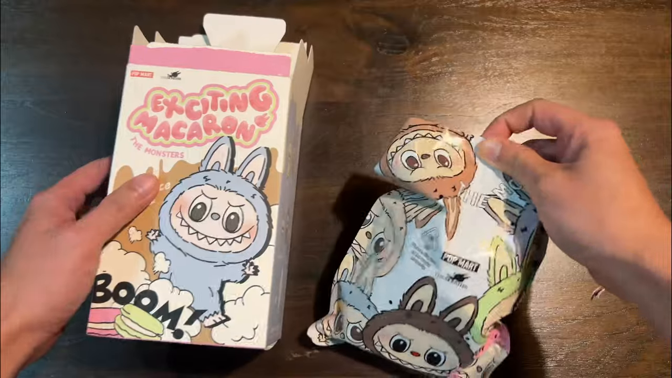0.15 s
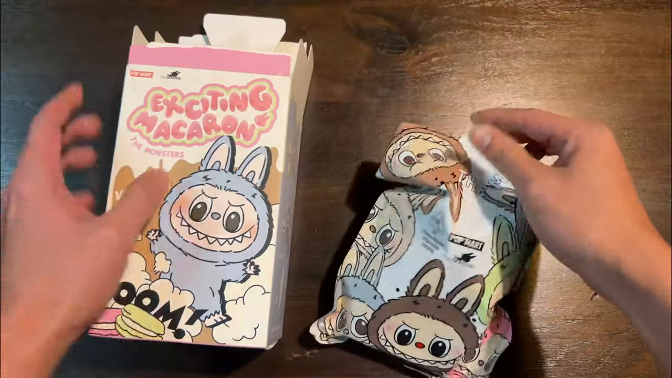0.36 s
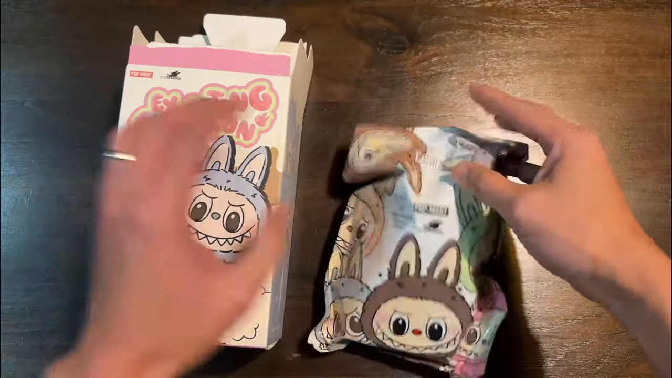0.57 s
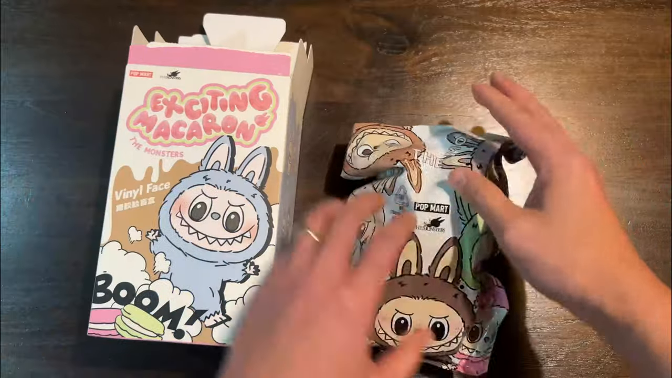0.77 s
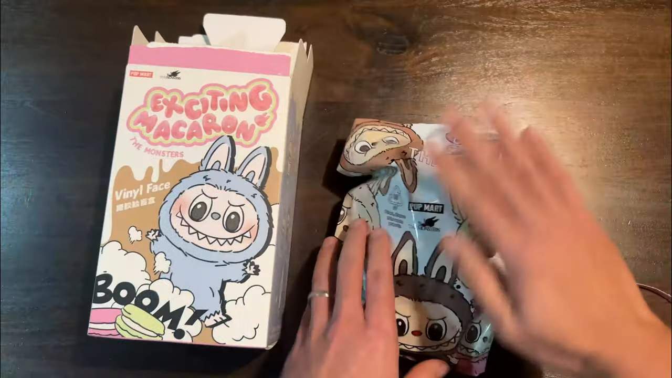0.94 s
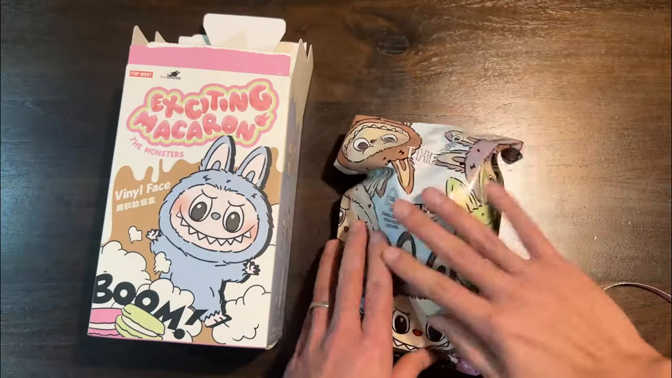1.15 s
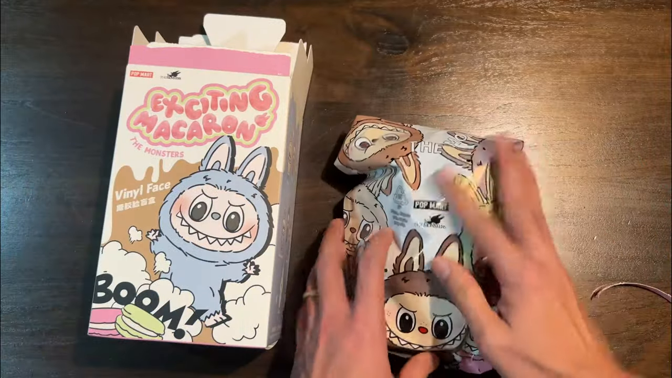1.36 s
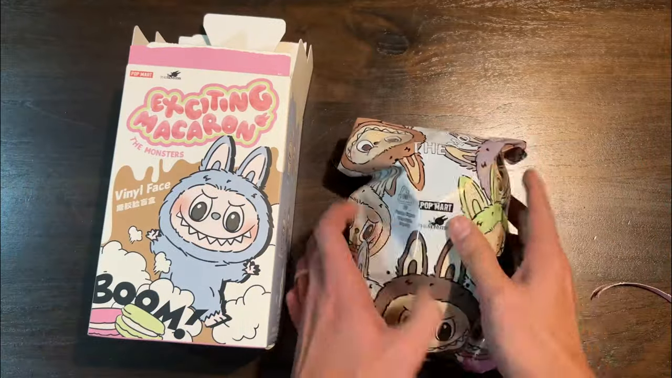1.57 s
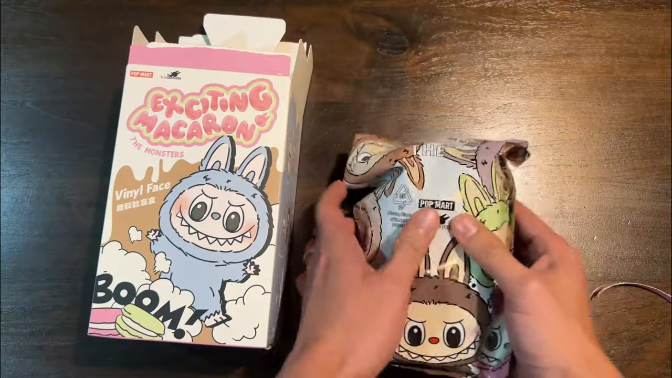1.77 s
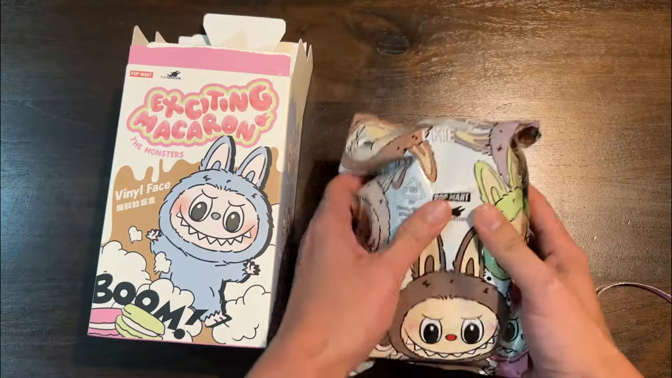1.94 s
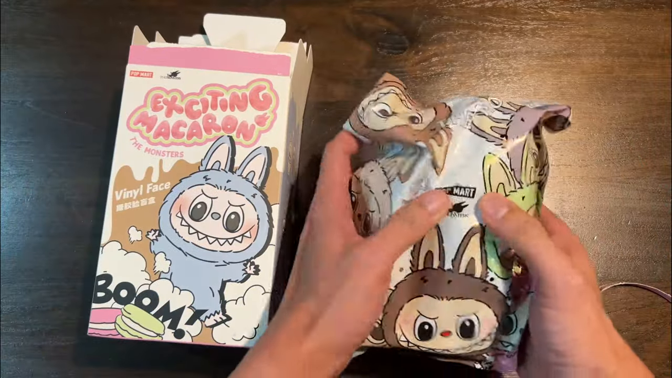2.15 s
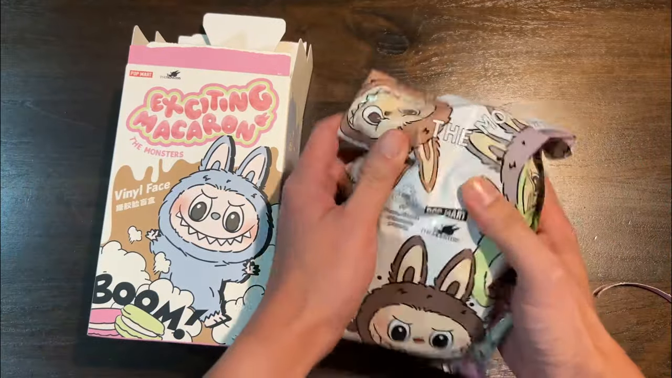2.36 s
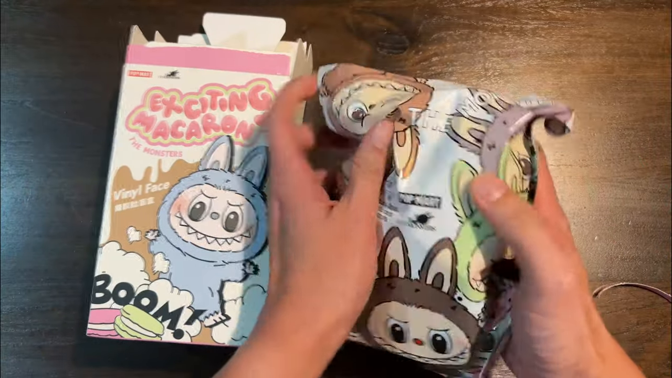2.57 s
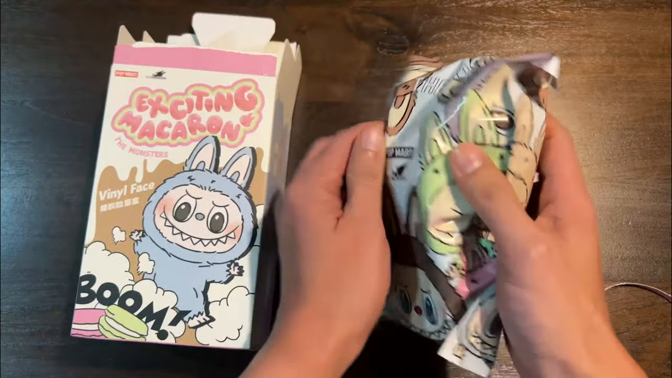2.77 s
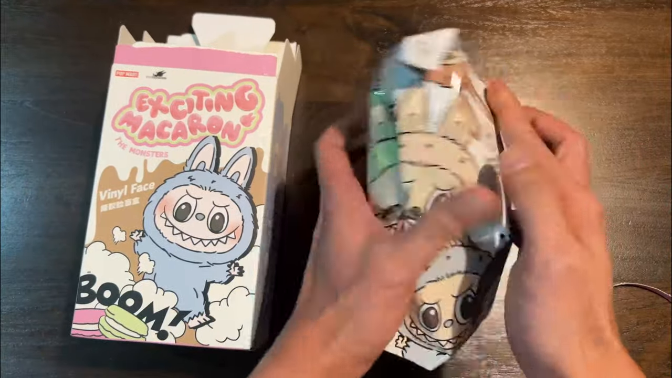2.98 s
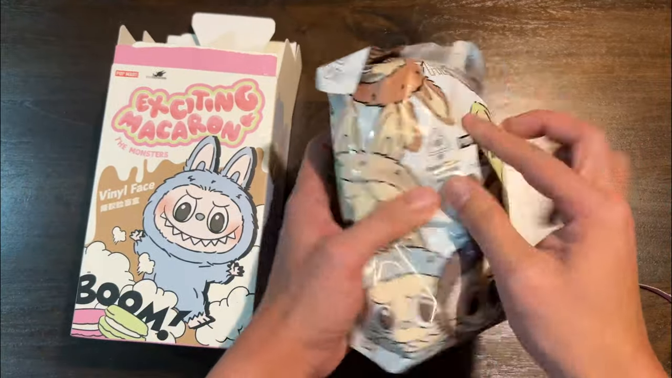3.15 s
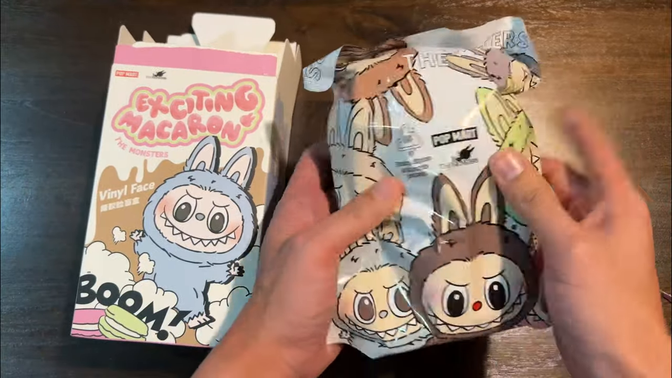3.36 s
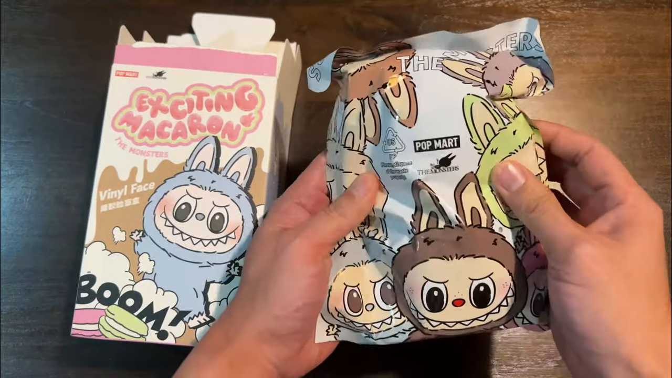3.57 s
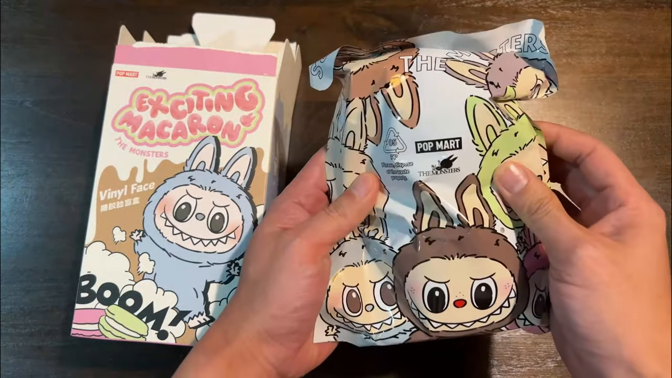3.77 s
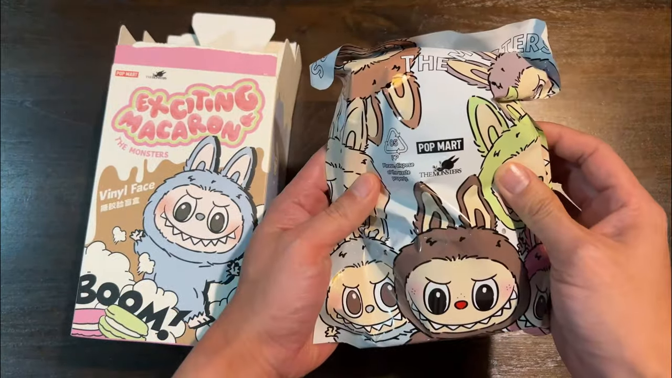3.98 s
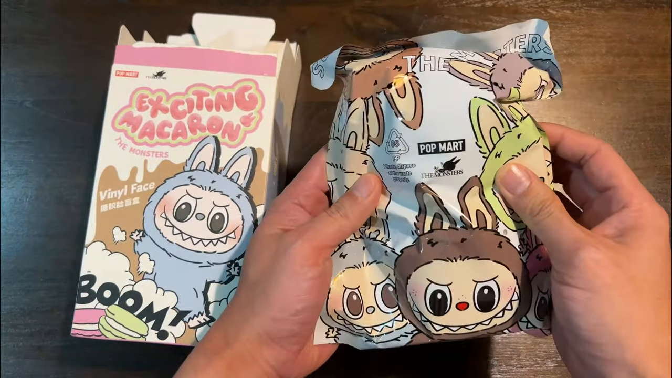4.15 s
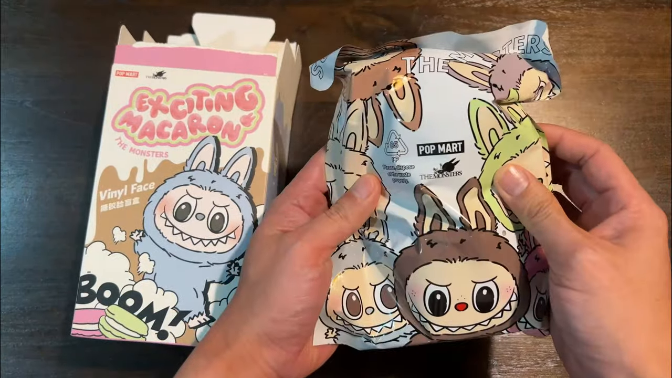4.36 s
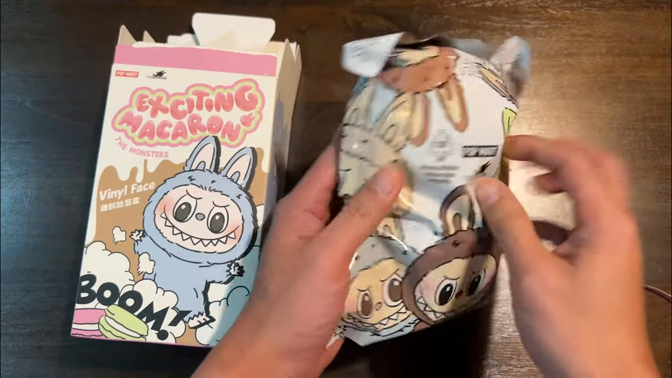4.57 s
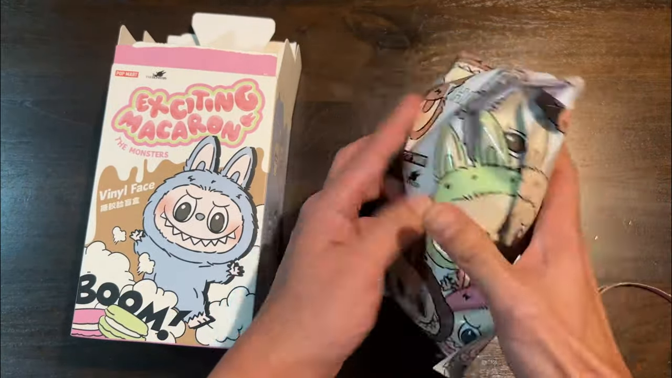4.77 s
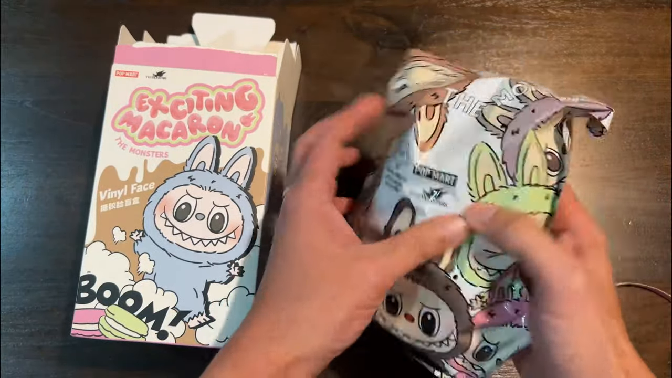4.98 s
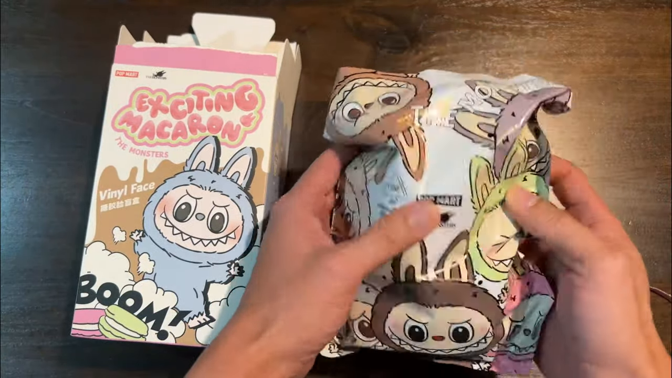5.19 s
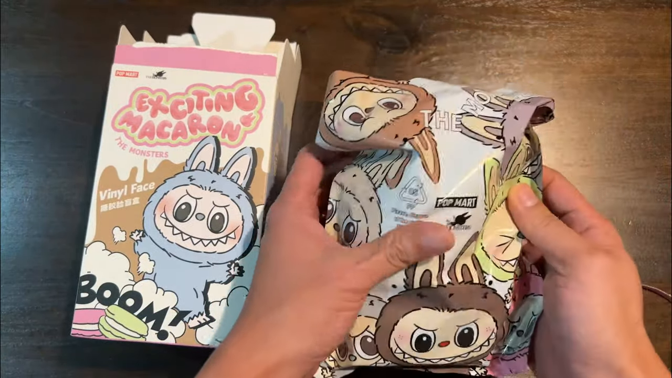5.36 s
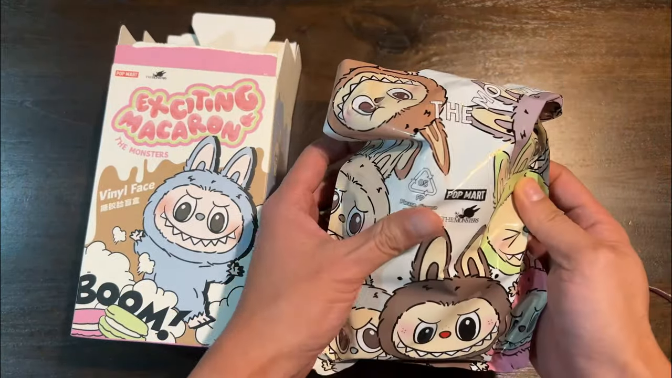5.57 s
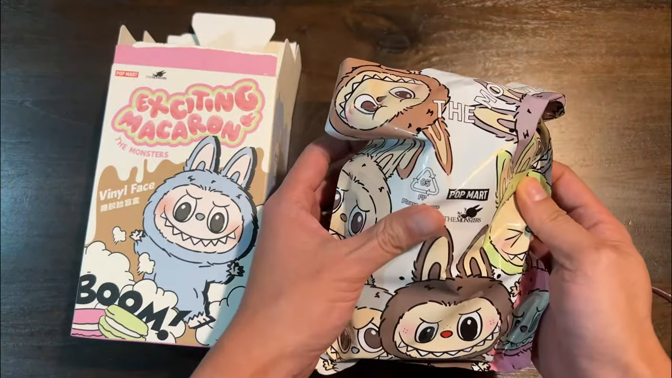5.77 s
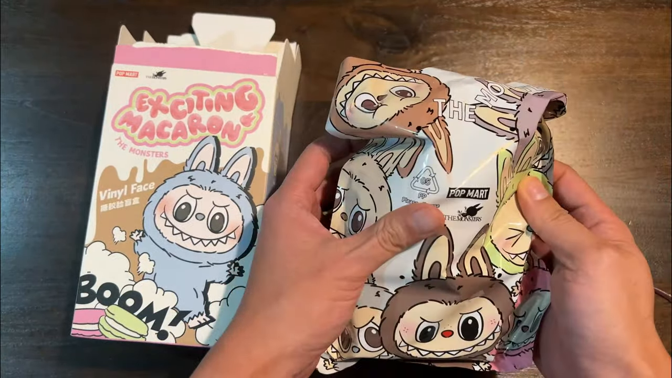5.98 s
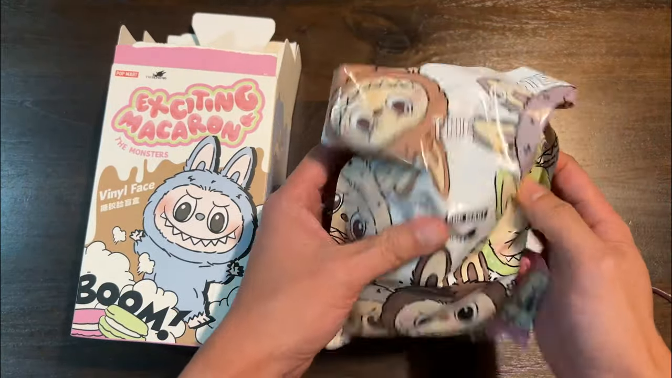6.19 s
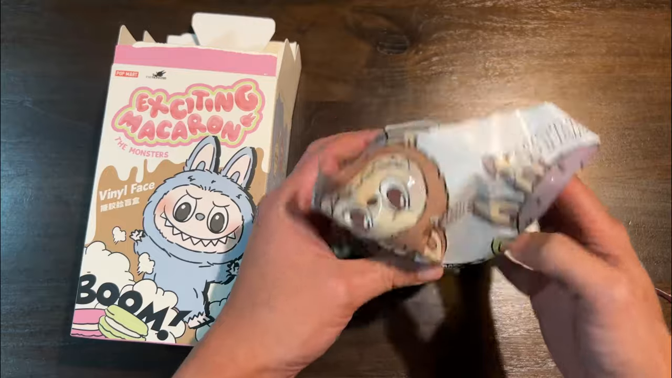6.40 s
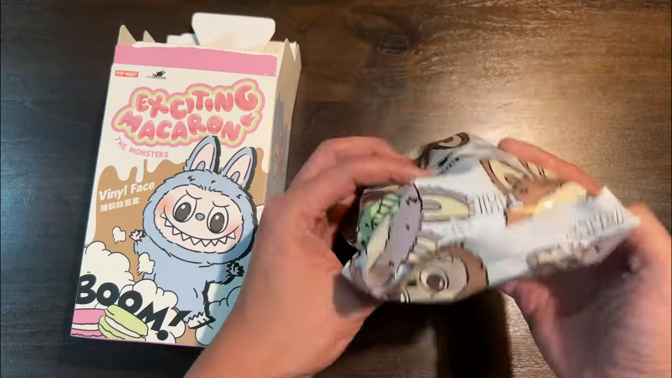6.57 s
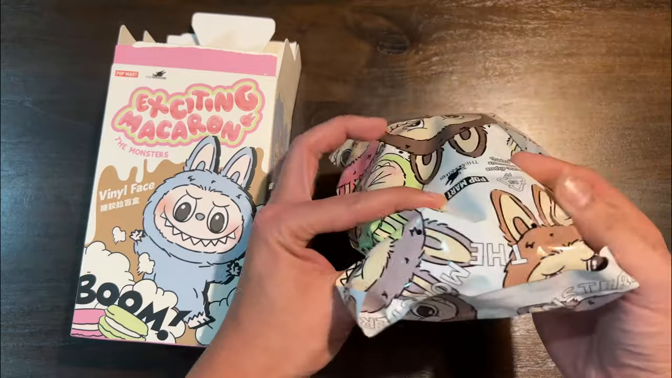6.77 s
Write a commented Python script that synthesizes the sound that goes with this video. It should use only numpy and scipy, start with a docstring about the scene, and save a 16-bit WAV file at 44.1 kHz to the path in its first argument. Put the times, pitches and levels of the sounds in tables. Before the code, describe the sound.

Close foil crinkling and snapping in uneven bursts with muffled bumps, pausing twice near silence before final crackles in a small humming room.

```python
"""Sharp snaps over a low hum come first, as two hands let go of a cardboard box; then the hands pick up,
squeeze and turn a foil bag over a wooden table. Buckling creases give noise bursts at the crack's pitch,
tiny bucklings sum to rustle and crackle, stick-slip makes rasps, and soft contacts ring damped modes.
A small live room answers with early reflections and a decaying tail; a phone with two ports hears it."""
import sys
import numpy as np
from scipy import signal
from scipy.fft import rfft, irfft, next_fast_len
from scipy.io import wavfile
from scipy.ndimage import uniform_filter1d

SR = 44100
rng = np.random.default_rng(int(sys.argv[2]) if len(sys.argv) > 2 else 0)


def unload_wav(signal):
    """Save mono or channel-first audio to the path in sys.argv[1] as 16-bit WAV at rate SR, clipped to [-1, 1]."""
    wavfile.write(
        sys.argv[1],
        SR,
        np.round(np.clip(np.atleast_2d(signal).T, -1, 1) * 32767).astype(np.int16),
    )


N = 301203
TIME = np.arange(N) / SR
SHORT = np.arange(2048) / SR  # time axis of one brief event [s]
BINS = np.fft.rfftfreq(len(SHORT), 1 / SR)[1:]  # its frequencies [Hz], without zero


def undb(db):
    """Level law: decibels to amplitude gain."""
    return 10 ** (np.asarray(db) / 20)


def at(points, hz):
    """Logarithmic frequency scale: interpolate (frequency [Hz], value) points along it."""
    f, value = np.transpose(points)
    return np.interp(np.log(np.maximum(hz, 1)), np.log(f), value)


def unit(x):
    """Root-mean-square normalisation: scale to rms 1."""
    return x / np.sqrt(np.mean(x ** 2))


def colour(x, points):
    """Minimum-phase filtering: a causal (frequency [Hz], gain [dB]) response keeps attacks sharp."""
    size = 2 * next_fast_len(x.shape[-1])
    log_gain = np.log(undb(at(points, np.fft.rfftfreq(size, 1 / SR))))
    cepstrum = irfft(log_gain)
    # folding the cepstrum onto positive times makes the response causal
    cepstrum[1:size // 2] *= 2
    cepstrum[size // 2 + 1:] = 0
    response = np.exp(rfft(cepstrum))
    return irfft(rfft(x, size) * response)[..., :x.shape[-1]]


def add(out, s, sound):
    """Superposition: mix a sound in at time s [s]."""
    start = max(int(s * SR), 0)
    part = sound[..., :max(N - start, 0)]
    out[..., start:start + part.shape[-1]] += part


def stereo(mid, side):
    """Diffuse-field coherence: two close ports agree in the bass and differ in the treble."""
    side = colour(side, [(60, -25.5), (250, -20.5), (500, -1.5), (1200, -3.5), (4000, 1.0)])
    return np.array([mid + side, mid - side])


# spectrum of the room noise: (frequency [Hz], level [dB])
AIR_COLOUR = [(25, -26.5), (50, 0), (100, -0.5), (200, -1.5), (350, -2.5), (500, -9.5), (700, -14),
              (1000, -16.5), (1400, -26), (2500, -29.5), (4000, -39), (8000, -52), (16000, -68)]
# hum of household machines: (frequency [Hz], level [dB])
HUM_LINES = [(49, -59.5), (60, -51.5), (68.3, -54.5), (107.7, -59.5)]
AIR_DB = -47  # each of the mid and side noises before width and stereo colour


def air(width=0.75):
    """Stationary noise: coloured random pressure, joined by steady sinusoidal hum lines."""
    mid, side = (unit(colour(noise, AIR_COLOUR)) for noise in rng.standard_normal((2, N)))
    hum = 0
    for hz, db in HUM_LINES:
        cycles = hz * TIME + rng.random()
        hum = hum + undb(db) * np.sqrt(2) * np.sin(2 * np.pi * cycles)
    return undb(AIR_DB) * stereo(mid, width * side) + hum


# reverberation time of each band: (frequency [Hz], time to fall 60 dB [s])
REVERBERATION = [(200, 1.5), (1000, 0.67), (3000, 0.73), (14000, .5)]
# spectrum of the room response: (frequency [Hz], gain [dB])
ROOM_GAIN = [(100, 0.5), (500, -2.5), (4000, -1.5), (8000, -3), (15000, -7)]


def room(x, tail_db=-10, early_db=-13, early_s=0.0021, width=0.52):
    """Reverberation: quick reflections off table and hands, then a diffuse tail longest in the bass."""
    t = np.arange(SR) / SR
    hz = np.fft.rfftfreq(len(t), 1 / SR)
    noise = rfft(rng.standard_normal((2, len(t))))
    bands = np.array(REVERBERATION)
    tail = 0
    for share, t60 in zip(np.eye(len(bands)), bands[:, 1]):
        band = irfft(noise * at(np.c_[bands[:, 0], share], hz), len(t))
        tail = tail + band * np.exp(-np.log(1000) * t / t60)
    tail = tail * (1 - np.exp(-t / 0.00073))
    early = rng.standard_normal((2, len(t))) * np.exp(-t / early_s) * (t > .002)
    response = undb(tail_db) * tail / np.linalg.norm(tail[0])
    response = response + undb(early_db) * early / np.linalg.norm(early[0])
    mid, side = signal.fftconvolve(x[None], colour(response, ROOM_GAIN), axes=1)[:, :N]
    return stereo(mid, width * side)


# phase between the two microphone ports: (frequency [Hz], lead of the left [rad])
PHASE_LEAD = [(350, 0), (580, 1.2), (860, 0.5), (1400, -0.13), (3200, 0.7), (4400, -1.02), (7000, -1.38),
              (14000, -1.6)]
# level between the ports: (frequency [Hz], left minus right [dB])
LEVEL_LEAD = [(200, -0.5), (380, 1.5), (700, -3), (1290, 0.5), (2380, -1), (4400, 1), (9000, 0)]


def ports(x):
    """Interaural-style differences: an off-axis bag reaches the ports with unlike phase and level."""
    hz = np.fft.rfftfreq(2 * N, 1 / SR)
    half = np.array([[.5], [-.5]])  # left and right each take half the difference
    gain = undb(half * at(LEVEL_LEAD, hz))
    turn = np.exp(1j * half * at(PHASE_LEAD, hz))
    return irfft(rfft(x, 2 * N) * gain * turn)[:, :N]


def thud(hz, decay_s, push_s, spread, sag, count=7):
    """Modal decay: a soft contact rings damped modes, which sink in pitch if sag is set. Peak 1."""
    t = np.arange(SR // 5) / SR
    place = np.linspace(-1, 1, count) + rng.uniform(-1.1, 1, count) / count
    modes = hz * np.exp(spread * place)
    cycles = modes[:, None] * (t + sag * decay_s * (1 - np.exp(-t / decay_s)))
    waves = np.sin(2 * np.pi * cycles)
    envelope = np.exp(-t / decay_s) * (1 - np.exp(-t / push_s))
    sound = signal.windows.cosine(count) @ waves * envelope
    return sound / np.abs(sound).max()


# faint tones as the hands come to rest: (time [s], level [dB], pitch [Hz])
FAINT_TONES = [(5.5, -52, 1080), (5.581, -61, 1770)]


def rings(decay_s=.06):
    """Single-mode resonance: faint tones swell briefly and decay exponentially."""
    out = np.zeros(N)
    for s, db, hz in FAINT_TONES:
        add(out, s, undb(db) * thud(hz, decay_s, push_s=.005, spread=0, sag=0, count=1))
    return out


# soft knocks of fingers and contents: (time [s], level [dB], nominal pitch [Hz])
SOFT_KNOCKS = [(.139, -28, 530), (.152, -28, 185), (.585, -28, 260), (1.186, -17, 816), (1.405, -35, 333),
               (1.676, -16, 902), (2.114, -21, 740), (2.347, -27, 332), (2.624, -13.5, 630),
               (2.631, -22, 307), (2.683, -20, 830), (2.732, -19.5, 428), (2.823, -19.5, 994),
               (3.295, -22.5, 347), (3.508, -23, 750), (5.085, -21, 695), (5.108, -22.5, 508),
               (5.231, -19.5, 853), (5.301, -29.5, 350), (6.175, -13, 1054), (6.234, -28.5, 345),
               (6.485, -24.5, 362), (6.552, -23.5, 417)]
# the bag bumps the table: (time [s], level [dB])
TABLE_BUMPS = [(2.592, -28), (2.735, -30.5)]
KNOCK_CYCLES = 2.8  # the hands damp a knock: nominal cycles per decay time


def knocks(table_hz=105):
    """Heavy damping: knocks on the bag ring for a few cycles; bumps excite the table top lower down."""
    out = np.zeros(N)
    for s, db, hz in SOFT_KNOCKS:
        add(out, s, undb(db) * thud(hz, decay_s=KNOCK_CYCLES / hz, push_s=.0007, spread=.25, sag=.2))
    for s, db in TABLE_BUMPS:
        add(out, s, undb(db) * thud(table_hz, decay_s=0.022, push_s=0.0052, spread=.7, sag=0))
    return out


def buckles(rate, spread_db):
    """Random point process: moments [samples] and strengths of bucklings, many weak and few strong."""
    when, strength = rng.random((int(rate * N / SR), 2)).T
    return (when * N).astype(int), undb(spread_db * strength ** 3)


def grains(ticks, low_hz, high_hz, decay_s, scatter, count):
    """Granular excitation: every tick rings a few modes of its own between two frequencies; rms 1."""
    when, size = ticks
    t = SHORT[:int(6 * decay_s * SR) + 8]
    place, phase, skew = np.split(rng.random((len(when), 3 * count, 1)), 3, axis=1)
    cycles = (low_hz + (high_hz - low_hz) * place) * t + phase
    envelope = size[:, None] * np.exp(-t / decay_s) * (1 - np.exp(-4 * t / decay_s))
    where = when[:, None] + np.arange(len(t))
    pair = []
    for side in (1, -1):
        # opposite phase shifts set the two ports apart
        waves = np.sin(2 * np.pi * cycles + side * scatter * (skew - .5)).sum(axis=1) * envelope
        pair.append(np.bincount(where.ravel(), waves.ravel(), N)[:N])
    return unit(np.array(pair))


# fingers skid across box and film: (time [s], duration [s], level [dB], treble tilt [dB/octave])
FINGER_SKIDS = [(0.574, 0.24, -50.5, -10.5), (0.579, 0.045, -38, -7), (0.882, 0.15, -57, -5),
                (0.944, 0.025, -39.5, -9.5), (1.158, 0.1, -42.5, -6.5), (2.1, 0.15, -43.5, -23.5),
                (2.515, 0.15, -32, -1.5), (4.393, 0.061, -57, -7), (6.121, 0.1, -49, -7),
                (6.16, 0.075, -44, 5), (6.596, 0.05, -33, -6)]


def skids(attack_share=0.13):
    """Stick-slip friction: skin slips so often that the ticks run together into a gritty rasp."""
    ticks = buckles(rate=1500, spread_db=1.5)
    rasp = grains(ticks, low_hz=493, high_hz=14200, decay_s=0.000085, scatter=0.76, count=4)
    out = np.zeros((2, N))
    for s, duration, db, tilt in FINGER_SKIDS:
        progress = np.linspace(0, 1, int(duration * SR))
        start = int(s * SR)
        piece = rasp[:, start:start + len(progress)]
        # the tilt acts over some three octaves above the knee at 2200 Hz
        sound = colour(piece, [(250, 0.0), (900, 6), (2200, 1.0), (17000, 3 * tilt)])
        envelope = (1 - np.exp(-progress / attack_share)) * (1 - progress)
        add(out, s, undb(db) * unit(sound * envelope))
    return out


# each press, lift or turn of the hands:
# (time [s], duration [s], rustle of the panels, level [dB], crackle of the creases, level [dB])
HAND_MOVES = [(0.045, 0.086, -47, -54), (0.134, 0.29, -43.5, -49.5), (0.558, 0.066, -43.5, -57),
              (1.063, 0.17, -40, -42), (1.344, 0.085, -44.5, -48.5), (1.568, 0.12, -40, -40.5),
              (1.778, 0.15, -42.5, -46), (2.05, 0.22, -37.5, -42), (2.297, 0.12, -39, -44.5),
              (2.478, 0.36, -37.5, -44), (2.89, 0.25, -41.5, -46), (3.095, 0.23, -38.5, -46),
              (3.446, 0.075, -40, -38.5), (4.437, 0.099, -43.5, -49.5), (4.538, 0.089, -40.5, -44),
              (4.686, 0.12, -43, -43), (4.886, 0.24, -35.5, -38), (5.138, 0.17, -46.5, -47.5),
              (5.36, 0.057, -58.5, -71), (5.495, 0.08, -59.5, -66), (6.174, 0.14, -47, -43),
              (6.387, 0.064, -38.5, -41.5), (6.563, 0.09, -42, -41)]
MOVE_ATTACK_S, MOVE_RELEASE_S = 0.01, 0.045  # the stir builds up and dies away
SETTLE_DB, SETTLE_S = -26, .13  # creases go on relaxing: level against the move, decay time
FIT_S, FIT_DB = .016, 3  # the foil yields in fits and starts: length, spread of levels


def grip():
    """Envelope modulation: moves build, hold unevenly and die away; the foil settles at rest."""
    gain = np.zeros((2, N))  # rows: rustle, crackle
    for s, length, rustle_db, crackle_db in HAND_MOVES:
        age = np.maximum(TIME - s, 0)
        after = np.maximum(age - length, 0)
        release = np.exp(-after / MOVE_RELEASE_S) + undb(SETTLE_DB) * np.exp(-after / SETTLE_S)
        envelope = (1 - np.exp(-age / MOVE_ATTACK_S)) * release
        gain += undb([[rustle_db], [crackle_db]]) * envelope
    fits = rng.standard_normal(size=2048)
    return gain * undb(FIT_DB * np.interp(TIME / FIT_S, np.arange(len(fits)), fits))


# filter for the panels: (frequency [Hz], gain [dB])
RUSTLE_GAIN = [(90, -7.5), (170, -1), (350, 3), (550, -5), (850, 1), (1300, 1), (2100, -2.5), (3200, -10.5),
               (6000, -23)]
# filter for the small creases: (frequency [Hz], gain [dB])
CRACKLE_GAIN = [(1200, -9), (2400, -1), (3500, 0.5), (5000, -5.5), (7500, -5.5), (11000, -7.5),
                (15500, -13.5), (17000, -27.5)]


def crinkle(flutter_db=-8):
    """Crackling noise: as the grip changes small creases give way, tick and shake their panels."""
    ticks = buckles(rate=430, spread_db=17)
    rustle = grains(ticks, low_hz=150, high_hz=3790, decay_s=0.0011, scatter=.15, count=3)
    crackle = grains(ticks, low_hz=1510, high_hz=15000, decay_s=0.00031, scatter=0.53, count=3)
    # wide slack panels flap more slowly
    flaps = buckles(rate=220, spread_db=6)
    flutter = grains(flaps, low_hz=120, high_hz=1398, decay_s=0.0029, scatter=0, count=2)
    rustle = unit(colour(rustle + undb(flutter_db) * flutter, RUSTLE_GAIN))
    crackle = unit(colour(crackle, CRACKLE_GAIN))
    rustle_gain, crackle_gain = grip()
    return rustle_gain * rustle + crackle_gain * crackle


LEAD_S = .004  # time from the start of a burst to its peak
EVEN = .2  # a crease's many modes fill each other's gaps: share of the chance ripple evened out


def ring(points, decay_s, tail_s, tail_db, rise_s, scatter, chatter_db=6):
    """Buckling impulse: a noise burst rises quickly, peaks at LEAD_S, dies fast and chatters on."""
    t = SHORT - LEAD_S
    after = np.maximum(t, 0)
    wander = unit(uniform_filter1d(rng.standard_normal(len(t)), size=36)).clip(-2, 2)
    chatter = unit(undb(chatter_db * wander))
    rise = np.exp(np.minimum(t, 0) / rise_s)
    decay = np.exp(-after / decay_s) + undb(tail_db) * chatter * np.exp(-after / tail_s)
    mid, side = rng.standard_normal((2, len(t))) * rise * decay
    ripple_db = 10 * np.log10(uniform_filter1d(np.abs(rfft(mid)[1:]) ** 2, size=25))
    # the crumpled sheet radiates a little differently towards each port
    pair = np.array([mid + scatter * side, mid - scatter * side])
    sound = colour(pair, np.c_[BINS, at(points, BINS) - EVEN * ripple_db])
    return sound / np.sqrt(np.sum(sound ** 2) / 2)


def resonance(points, hz, lift_db, octaves=0.36):
    """Broad resonance: lift a (frequency [Hz], level [dB]) spectrum around one pitch."""
    bump = np.exp(-(np.log2(BINS / hz) / octaves) ** 2)
    return np.c_[BINS, at(points, BINS) + lift_db * bump]


def all_round(parts):
    """Radiated power: sum the smooth spectra of (level [dB], spectrum) parts over all directions."""
    power = sum((undb(db) * unit(undb(at(points, BINS)))) ** 2 for db, points in parts)
    return colour(signal.unit_impulse(len(SHORT)), np.c_[BINS, 10 * np.log10(power)])


# spectrum of the crack before its resonance: (frequency [Hz], level [dB])
CRACK_SPECTRUM = [(500, -24), (1200, -6.5), (2200, -1), (5000, -1), (8000, -8), (14000, -28)]
# spectrum of the panel's body before its resonance: (frequency [Hz], level [dB])
BODY_SPECTRUM = [(120, -9.5), (400, -2.5), (800, -0.5), (1300, 2.5), (1900, -1.5), (2800, -8.5),
                 (12000, -50.5)]
# spectrum of the fold's sharp edge: (frequency [Hz], level [dB])
EDGE_SPECTRUM = [(1500, -22), (4200, -2), (6300, 4), (8000, 5), (10000, 1), (12000, 3.5), (13500, -5.5),
                 (15500, -1), (17000, -22)]
SNAP_S = .01  # time over which the level of a snap is taken
SCATTER = .24  # how unlike the two ports hear one crease (side over mid)
# small stiff panels sound both brighter and higher: pitch when edge equals body,
# rise per dB of edge over body, chance spread
PANEL_HZ, PANEL_OCTAVES_PER_DB, PANEL_SPREAD_OCTAVES = 1180, 0.16, 0.37
# the table top mirrors each snap: shortest and longest lag, strength
MIRROR_MIN_S, MIRROR_MAX_S, MIRROR_DB = .0002, .0009, -9.5


def snap(crack_db, body_db, edge_db, crack_hz):
    """Impulsive radiation: crease, edge and panel sound; the table mirrors. Rows: left, right, room."""
    rise = PANEL_OCTAVES_PER_DB * (edge_db - body_db)
    panel_hz = PANEL_HZ * 2 ** (rise + PANEL_SPREAD_OCTAVES * rng.standard_normal())
    crease = resonance(CRACK_SPECTRUM, crack_hz, lift_db=12)
    panel = resonance(BODY_SPECTRUM, panel_hz, lift_db=7)
    crack = ring(crease, decay_s=.00037, tail_s=.0029, tail_db=-15.5, rise_s=.00022, scatter=SCATTER)
    # the sharp edge of the fold dies away fastest
    sharp = ring(EDGE_SPECTRUM, decay_s=.00021, tail_s=.0018, tail_db=-22, rise_s=.00022, scatter=SCATTER)
    body = ring(panel, decay_s=.00055, tail_s=.006, tail_db=-15, rise_s=.00025, scatter=.12)
    click = undb(crack_db) * crack + undb(edge_db) * sharp
    lag = int(SR * (MIRROR_MIN_S + (MIRROR_MAX_S - MIRROR_MIN_S) * rng.random()))
    mirrored = click + undb(MIRROR_DB) * np.roll(click, lag, axis=1)
    click = mirrored / np.hypot(1, undb(MIRROR_DB))
    outward = all_round([(crack_db, crease), (edge_db, EDGE_SPECTRUM), (body_db, panel)])
    return np.sqrt(SNAP_S * SR) * np.vstack([click + undb(body_db) * body, outward])


# creases snapping through, from loud snaps to faint ticks: (time [s], crack level [dB],
# body of the panel, level [dB], bright edge, level [dB], pitch of the crack [Hz])
CREASE_SNAPS = [(0.0288, -42.5, -43, -41.5, 3600), (0.061, -36.5, -34.5, -44.5, 2250),
                (0.172, -32.5, -36, -37.5, 1890), (0.2071, -27.5, -32, -27.5, 1870),
                (0.2113, -35.0, -39, -31, 1903), (0.263, -38, -45, -42.5, 1900),
                (0.3362, -34.5, -42.5, -32.5, 1930), (0.3472, -42.5, -43, -40, 3200),
                (0.385, -37.5, -39.5, -36, 6260), (0.436, -46.5, -39, -45, 2696),
                (0.5154, -59, -45, -63, 2200), (0.5579, -51, -36, -43, 3990),
                (0.5861, -40, -36, -48.5, 3184), (0.8083, -67, -48.5, -81, 2000),
                (0.9217, -55, -41.5, -54.5, 3880), (0.9573, -47.5, -46.5, -59, 4440),
                (1.0474, -44.5, -33, -47.5, 6000), (1.078, -37, -42.5, -49, 2700),
                (1.1013, -30, -51, -48.5, 2080), (1.108, -30.5, -46.5, -45, 6200),
                (1.1359, -36, -49, -37, 2720), (1.185, -27.5, -35, -19, 3630),
                (1.3272, -62, -40.5, -49.5, 5000), (1.3943, -46.5, -32.5, -40.5, 6000),
                (1.482, -44, -39.5, -58, 4270), (1.5205, -32.5, -47, -34.5, 3650),
                (1.5588, -41, -44, -41, 3500), (1.5772, -41.5, -35, -39.5, 1950),
                (1.583, -29.5, -32, -32.5, 1925), (1.6439, -41.5, -34, -51, 2300),
                (1.6681, -33, -34.5, -47.5, 2300), (1.6753, -44.5, -37, -29, 3500),
                (1.704, -34.5, -36.0, -44.5, 2700), (1.7914, -29, -37.5, -37, 2164),
                (1.7986, -37, -38.5, -42.5, 2440), (1.8375, -32.5, -37.5, -37, 6210),
                (1.876, -37.5, -40, -45.5, 1900), (1.884, -54, -46.5, -33, 3000),
                (1.9742, -24.5, -22.5, -22, 3500), (1.9843, -45, -31.5, -37, 4050),
                (2.0286, -35, -37, -37, 1900), (2.0342, -32, -34, -29, 4250),
                (2.0581, -40, -44, -46.5, 3800), (2.094, -59, -27.5, -44, 3505),
                (2.1873, -37.5, -30, -33.5, 2100), (2.2034, -35, -36, -35, 2990),
                (2.2281, -32, -43, -36, 3270), (2.2408, -37.5, -45, -41, 4180),
                (2.3548, -44.5, -30.5, -29.5, 3500), (2.3604, -29.5, -25, -33.5, 3220),
                (2.4119, -42, -35, -48, 2500), (2.4416, -34.0, -33, -31, 4240),
                (2.4869, -39, -38, -52.5, 2520), (2.4996, -32.5, -36, -46.5, 6000),
                (2.5094, -33.5, -34.5, -29.5, 2720), (2.5173, -38.0, -47.5, -24.5, 2720),
                (2.5483, -30.5, -32.5, -30, 2710), (2.5893, -34.5, -33.5, -25, 3000),
                (2.5963, -33, -29.5, -29.5, 2950), (2.6792, -28, -43, -26, 4030),
                (2.6846, -44.5, -33, -27.5, 1930), (2.732, -32, -30.5, -24.5, 4610),
                (2.759, -41.5, -31.5, -30, 2740), (2.7749, -43, -35, -47, 2490),
                (2.8244, -37.5, -28.5, -31, 3200), (2.8521, -33.5, -37, -36.5, 5000),
                (2.8631, -34.5, -37, -34.5, 2714), (2.9051, -29.5, -31.5, -47.5, 2054),
                (2.9677, -29, -26.5, -29.5, 2550), (2.9754, -33.5, -42.5, -49, 3230),
                (3.018, -29, -33, -36, 2246), (3.114, -36, -36.5, -33.5, 3200),
                (3.1289, -40.5, -38.5, -32.5, 2750), (3.1347, -21.5, -34.5, -22.5, 1836),
                (3.1457, -33, -24.5, -25.5, 5020), (3.1611, -24, -33.5, -26, 2560),
                (3.1659, -32, -32, -33, 2530), (3.2515, -38, -42, -35, 6200),
                (3.2574, -39, -32.5, -46.5, 2210), (3.2685, -30, -31.5, -42.5, 2540),
                (3.2952, -23.5, -36, -25.5, 2570), (3.393, -51, -38.5, -50, 2300),
                (3.4399, -30.5, -28.5, -41, 5500), (3.4474, -32.5, -34, -24, 3430),
                (3.4659, -29.5, -34.5, -42.5, 5970), (3.507, -32.5, -28.5, -28.5, 3180),
                (3.5137, -34, -31, -31.5, 2500), (3.562, -35.5, -45, -29.5, 3150),
                (3.6222, -30.5, -32, -26, 2960), (3.7051, -36.5, -40.5, -33, 1920),
                (3.7619, -37, -46, -29.5, 3220), (3.954, -64.5, -56.5, -72.5, 2500),
                (4.165, -65, -56.5, -85, 2500), (4.416, -63, -41.5, -44.5, 2500),
                (4.46, -55.5, -35, -36, 2090), (4.491, -35.5, -38.5, -39.5, 3440),
                (4.5157, -31.5, -38.5, -35, 2520), (4.5546, -40.5, -32, -29.5, 2996),
                (4.5634, -36.5, -35, -33, 3200), (4.5711, -32.5, -39, -30.5, 1900),
                (4.5781, -25, -27.5, -29.5, 1900), (4.6178, -37, -35.5, -50.5, 2500),
                (4.6985, -37.5, -29.5, -29.5, 2700), (4.7097, -41, -35.5, -25, 2300),
                (4.7492, -42, -42.5, -31.5, 3500), (4.776, -41.5, -32.5, -44, 2720),
                (4.809, -30.5, -32.5, -33, 1910), (4.8157, -30.5, -29.5, -38.5, 1900),
                (4.8291, -38.5, -38.5, -51, 2500), (4.874, -37.5, -48.5, -55, 1910),
                (4.9027, -29.5, -31.5, -27.5, 2500), (4.933, -27.5, -36.5, -33, 3480),
                (4.9842, -39, -31, -33, 3180), (5.008, -41, -35, -39.5, 3900),
                (5.0825, -22.5, -26.5, -23.5, 1860), (5.126, -26, -35, -26, 4200),
                (5.1663, -40.5, -42.5, -50, 3000), (5.1842, -44, -34.5, -35, 3200),
                (5.2327, -53, -42.5, -45.5, 5500), (5.2662, -39.5, -28, -21, 1860),
                (5.2809, -28, -36.5, -33, 4130), (5.4121, -64, -50, -61.5, 2500),
                (5.4997, -55.0, -46.5, -55.5, 6000), (5.541, -59.5, -43.5, -62.5, 1890),
                (6.1567, -38.5, -35, -35, 4200), (6.1759, -35, -28.5, -30.5, 3200),
                (6.192, -35, -37, -39, 2500), (6.2337, -49, -37, -44, 4600),
                (6.2695, -37.5, -38.5, -37, 1900), (6.3187, -42.0, -38.5, -34.5, 2300),
                (6.336, -35, -40, -32.5, 1900), (6.3985, -36, -36.0, -35, 2500),
                (6.4422, -56, -32.5, -36.5, 3180), (6.475, -36.5, -35, -33, 3250),
                (6.4841, -31.5, -30.5, -28, 6140), (6.528, -39, -44, -51, 2980),
                (6.5527, -31, -30.5, -31, 2070), (6.5767, -52, -26.5, -24.5, 6000),
                (6.586, -44, -32, -29.5, 3500), (6.6099, -41, -30, -23.5, 3500),
                (6.6139, -23.5, -21.5, -27, 2030), (6.66, -41, -43, -43, 3000),
                (6.8032, -43, -34, -28.5, 2280), (6.8103, -27.5, -26, -24.5, 3550)]
# a neighbour gives way after a snap: scale of the gap, level where body equals crack
CHAIN_WAIT_S, CHAIN_DB = .0028, -17
# slack foil crumples on loudly, taut foil is followed by a fainter snap:
# dB of chain level per dB of body over crack
CHAIN_PER_SLACK = 0.84


def snaps():
    """Load transfer: a weaker neighbour yields just after each snap, louder where the foil is slack."""
    out = np.zeros((3, N))
    for s, crack, body, edge, hz in CREASE_SNAPS:
        add(out, s - LEAD_S, snap(crack, body, edge, hz))
        chain_db = min(CHAIN_DB + CHAIN_PER_SLACK * (body - crack), -5)
        wait = CHAIN_WAIT_S * (.5 + rng.exponential())
        add(out, s + wait - LEAD_S, undb(chain_db) * snap(crack, body, edge, hz))
    return out


def scene(snaps_db=0.5):
    """Direct and reverberant field: the bag close by, its echo in the room, and the room's own noise."""
    cracks = undb(snaps_db) * snaps()
    handling = crinkle() + skids() + knocks() + rings()
    direct = ports(cracks[:2] + handling)
    echo = room(cracks[2] + handling.mean(axis=0))
    return direct + echo + air()


TOP_HZ = 16100  # upper band edge of the phone


def record(dry):
    """Band limiting and saturation: the phone drops deep bass, rounds tall peaks and cuts the top."""
    dry = signal.sosfilt(signal.butter(3, 38, "high", fs=SR, output="sos"), dry)
    dry = .9 * np.tanh(dry / .9)
    return signal.sosfilt(signal.ellip(8, .2, 70, TOP_HZ, fs=SR, output="sos"), dry)


dry = scene()
out = record(dry)
unload_wav(out)
```